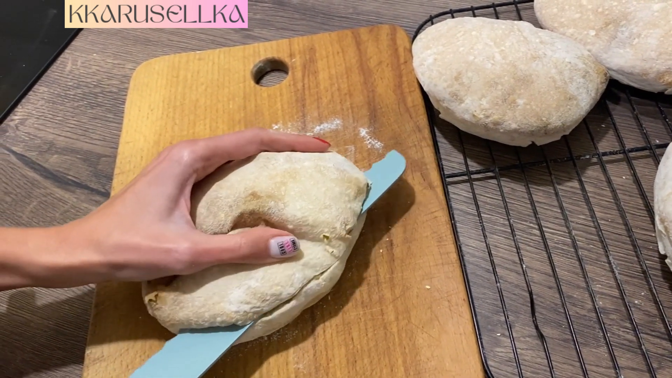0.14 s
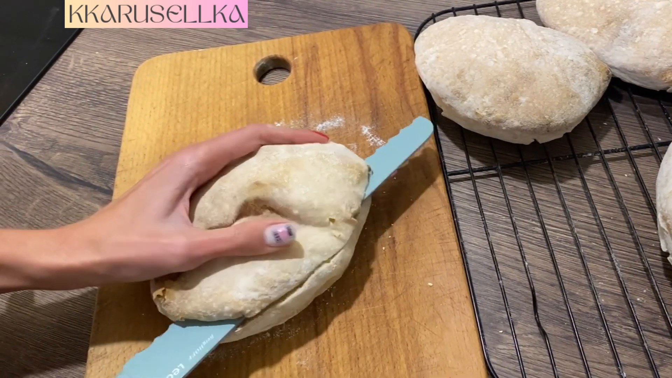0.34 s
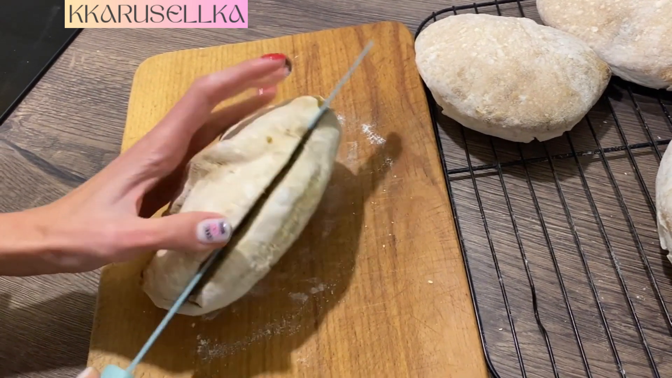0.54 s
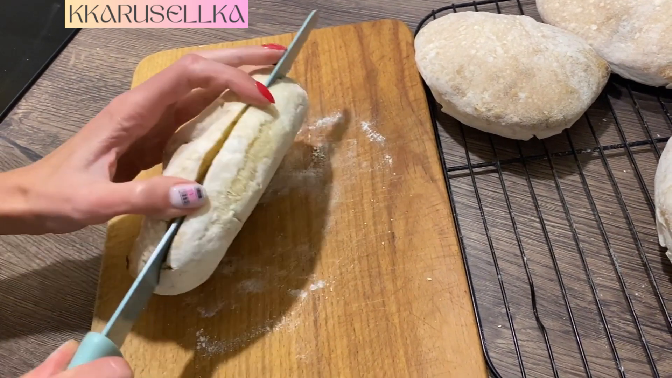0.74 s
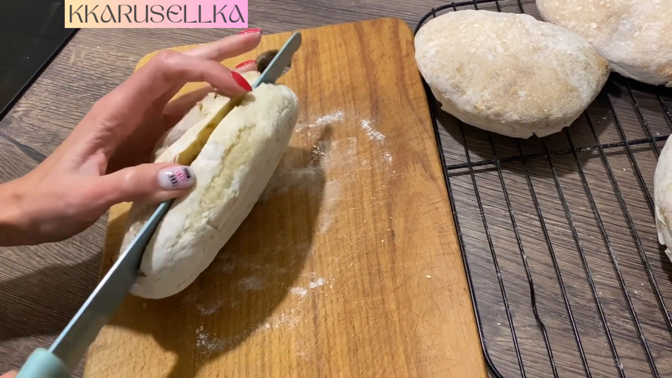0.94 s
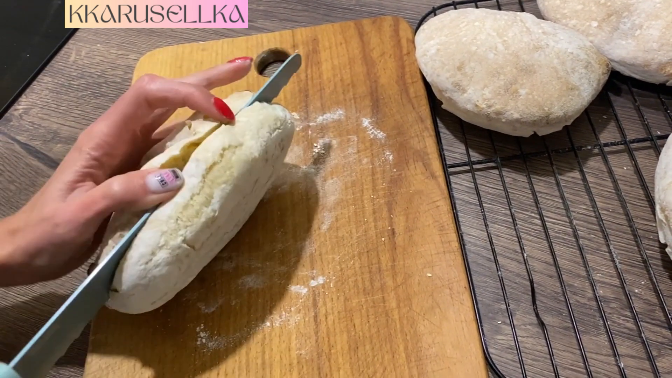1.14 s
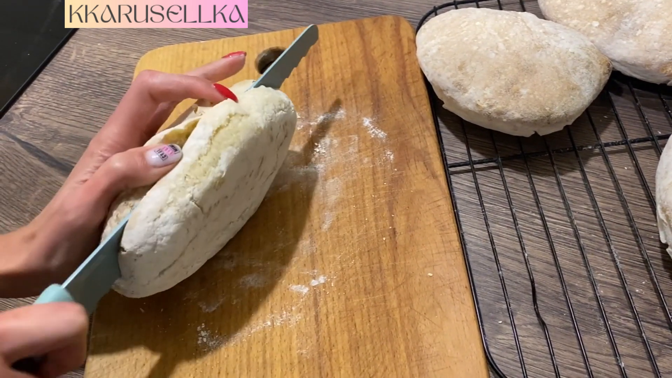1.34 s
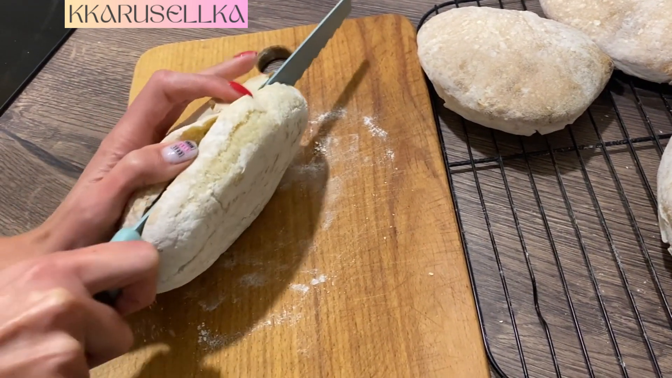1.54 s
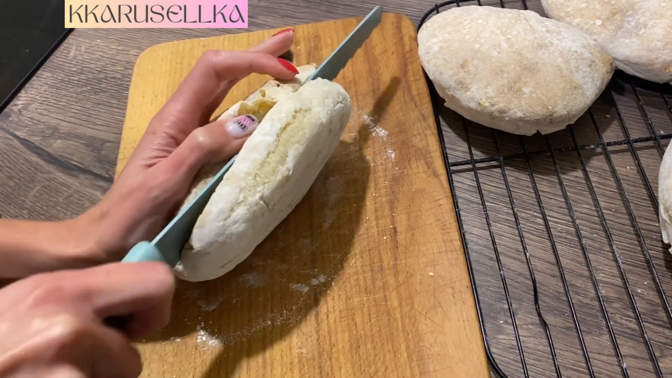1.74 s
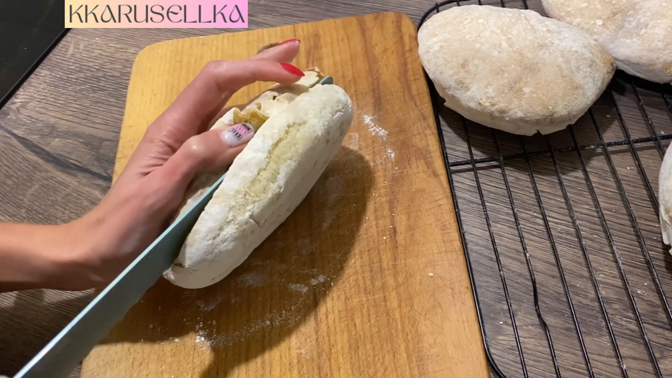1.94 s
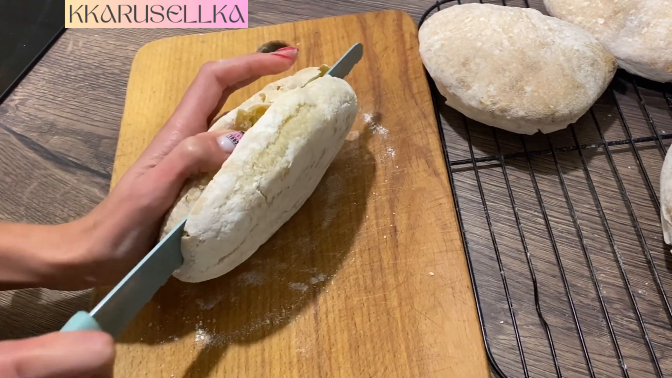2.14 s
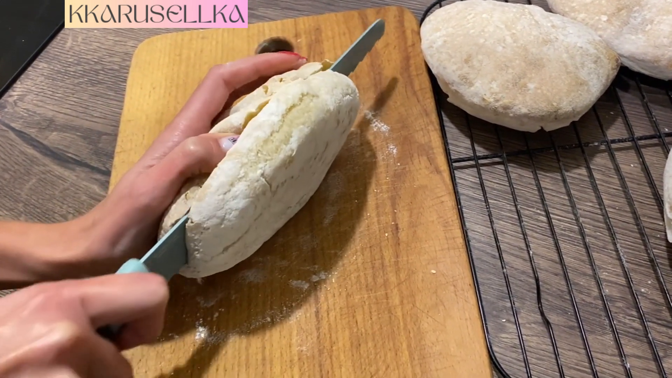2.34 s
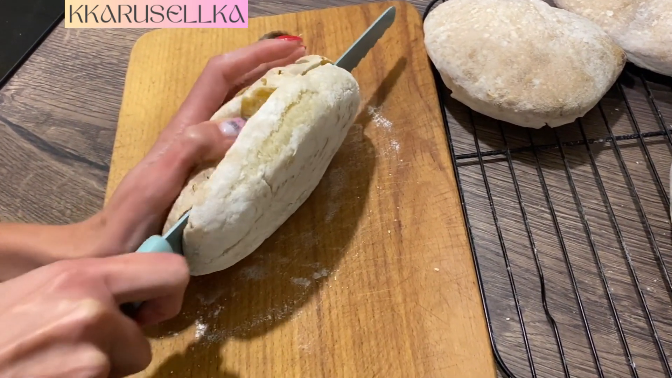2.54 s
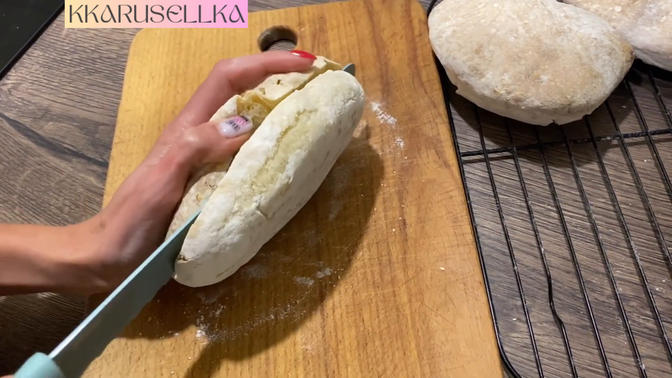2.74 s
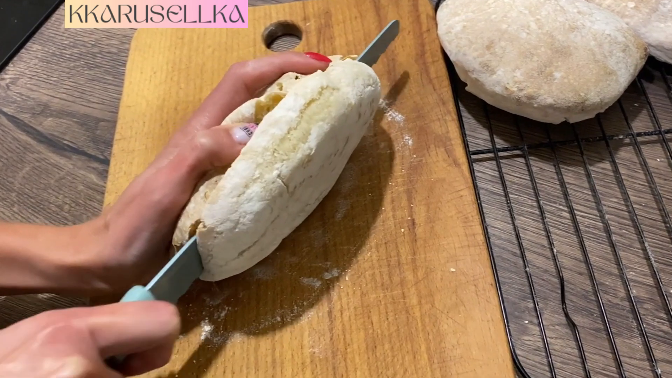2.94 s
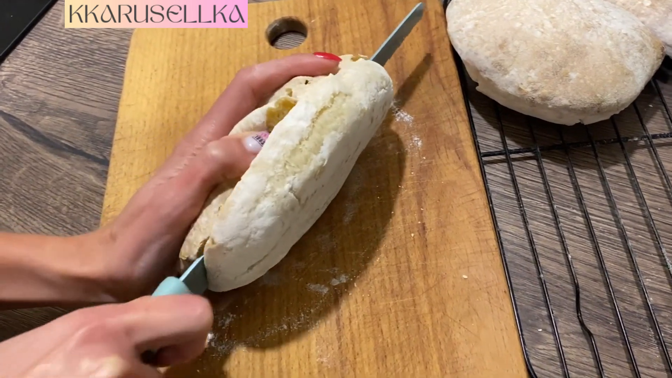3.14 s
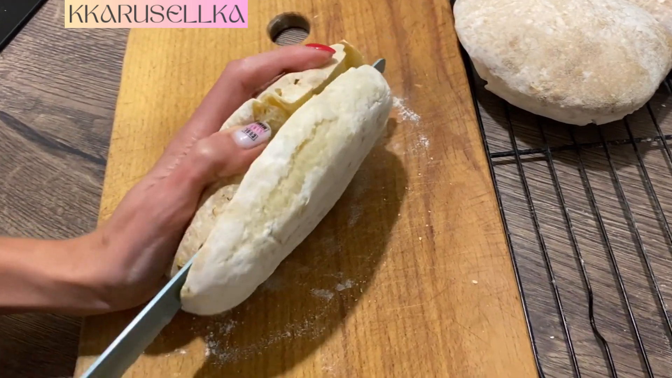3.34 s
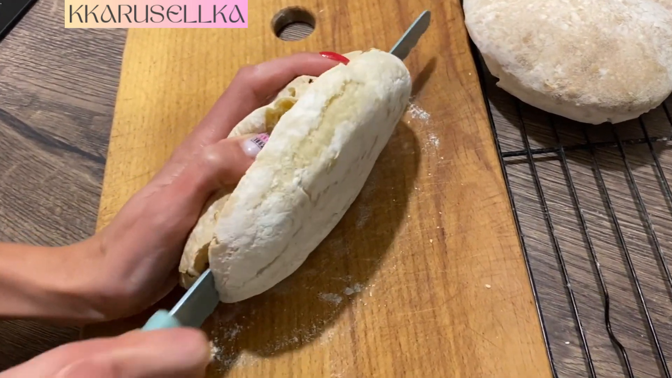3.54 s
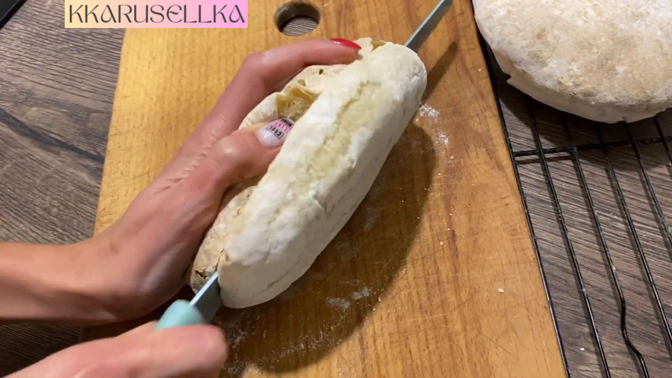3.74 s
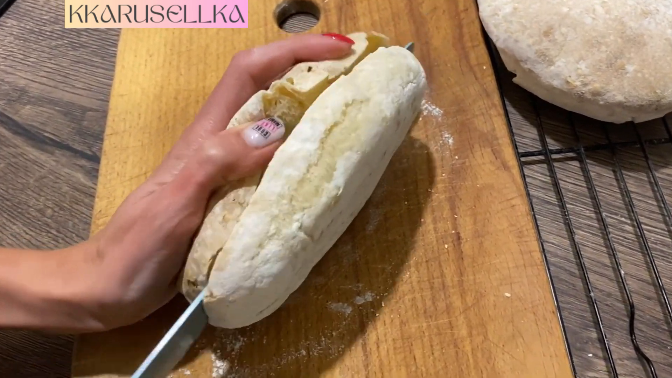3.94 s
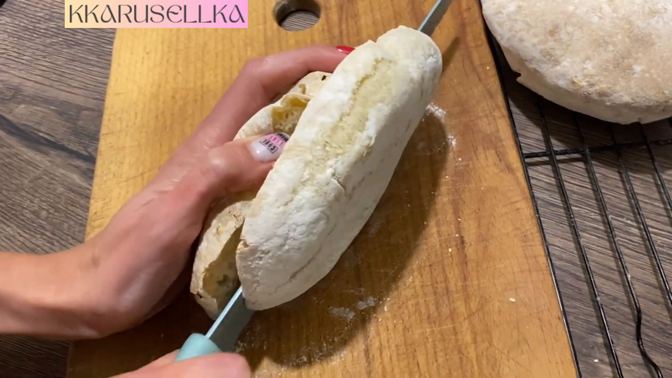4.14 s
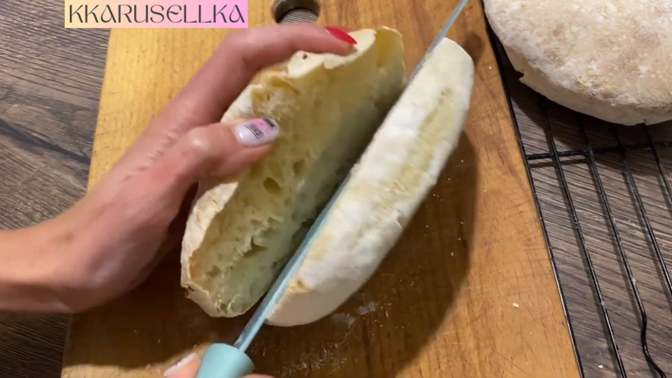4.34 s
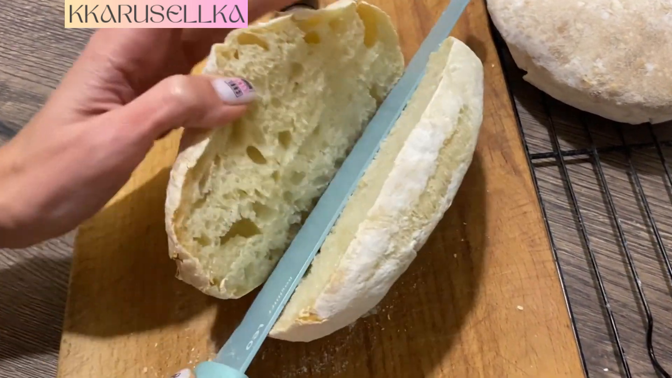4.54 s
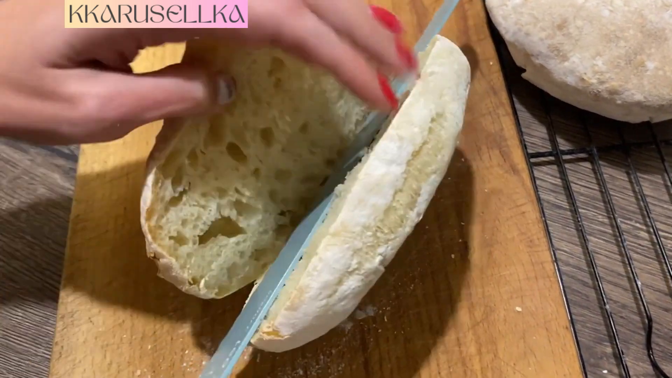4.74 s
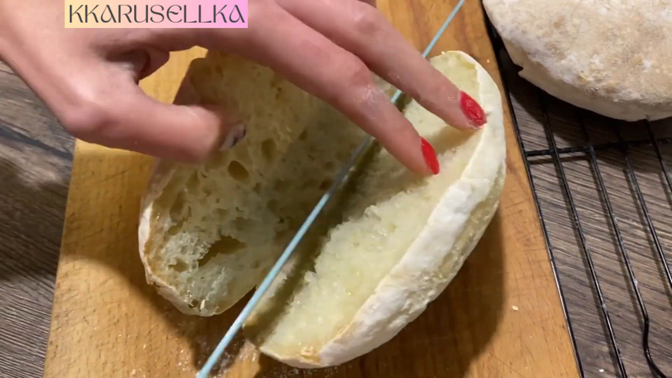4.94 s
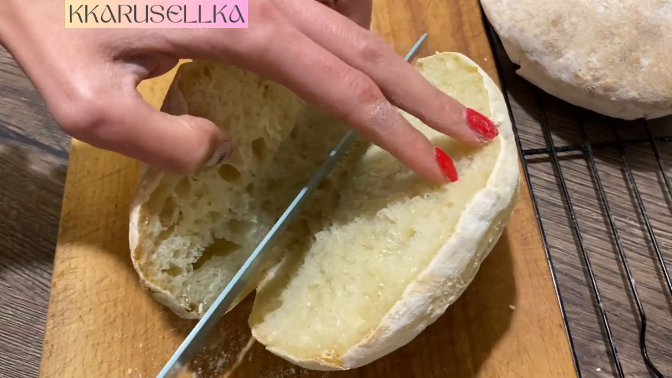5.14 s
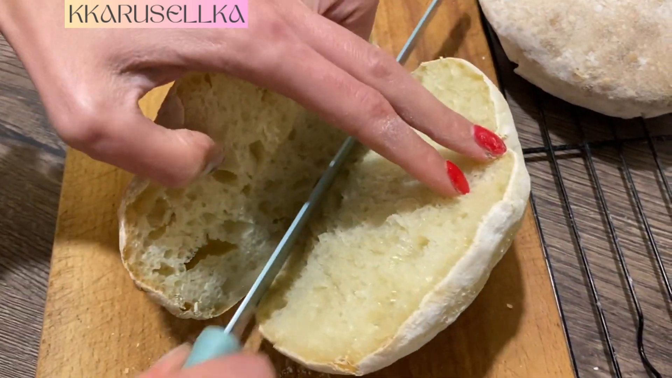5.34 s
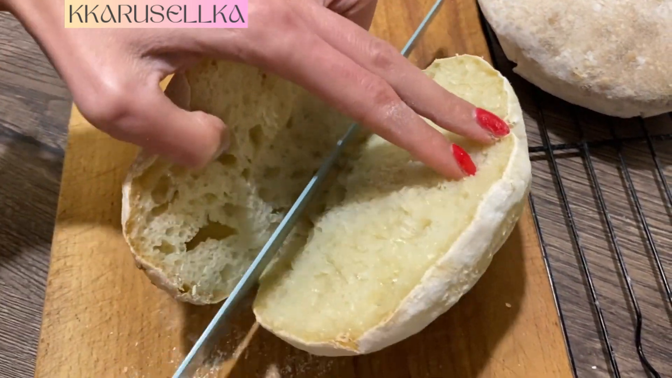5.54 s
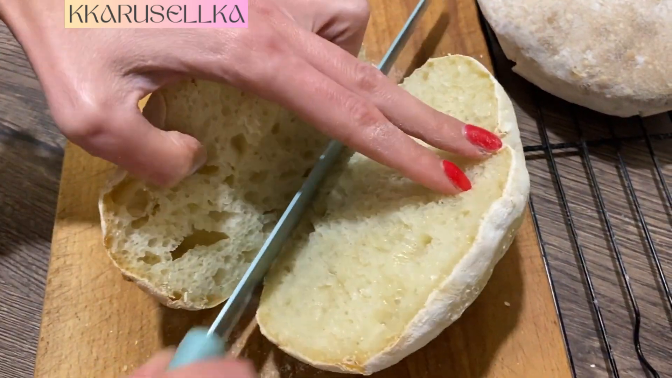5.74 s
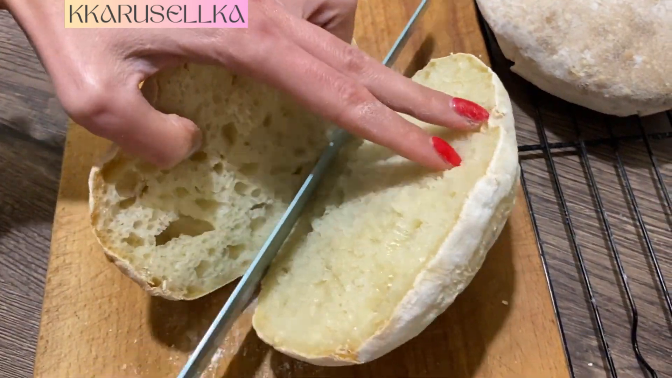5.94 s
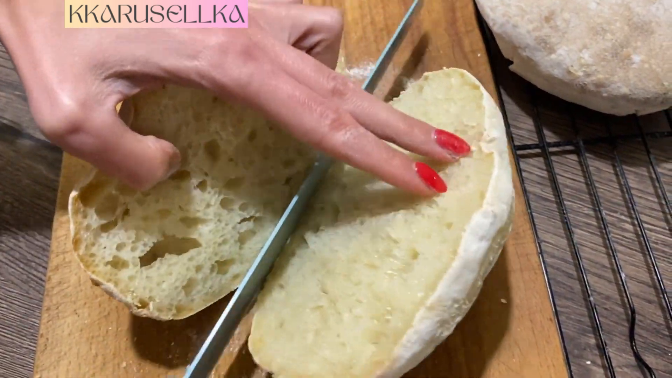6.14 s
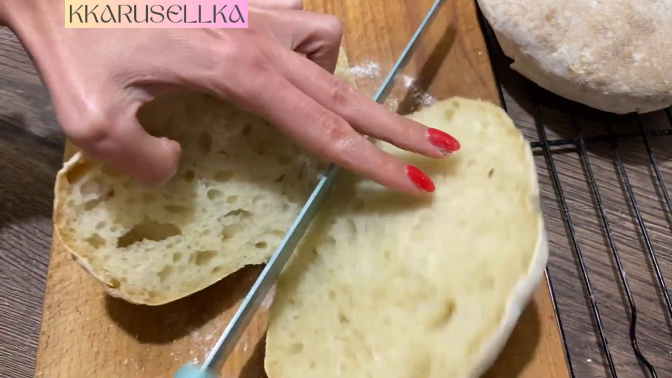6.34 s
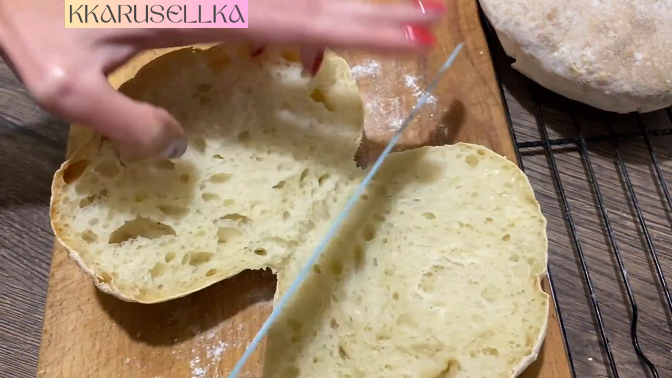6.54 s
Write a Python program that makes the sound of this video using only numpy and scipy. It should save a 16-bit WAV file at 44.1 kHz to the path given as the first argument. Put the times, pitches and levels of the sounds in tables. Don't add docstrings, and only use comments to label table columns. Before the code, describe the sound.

A close, dry stereo pickup beside a loaf on a wooden board in a small kitchen, with a low, steady fridge hum behind. From 0 s a long knife draws through crust with a hissing, gritty rasp, soft hand rustles and dull crumb crunches; a sharp crack comes near 0.7 s. Strokes alternate unevenly, with a bright, forceful one and a hard snap around 1.5 s. From 2 to 4 s they become shorter and closer together, thudding thickly in the crumb, with flakes ticking and the table booming faintly. At about 4.2 s the sawing dies to near silence, leaving slight finger rustles and hum. Light scratches return at 4.8 s, then quicker, firm strokes from 5.2 s to the end at 6.5 s, crackling through the bottom crust, with low bumps strongest around 5.5 to 6.2 s.

```python
import sys
import numpy as np
from scipy import signal
from scipy.fft import rfft, irfft, next_fast_len
from scipy.io import wavfile
from scipy.ndimage import uniform_filter1d, minimum_filter1d

SR = 44100
rng = np.random.default_rng(int(sys.argv[2]) if len(sys.argv) > 2 else 0)


def unload_audio(sound):
    columns = np.transpose(np.atleast_2d(sound))
    steps = np.round(np.clip(columns, -1, 1) * 32767)
    wavfile.write(sys.argv[1], SR, steps.astype(np.int16))


def natural_amplitude(level_db):
    exponent = np.asarray(level_db, float) / 20
    return 10 ** exponent


N = 289867


def knife():
    # (start [s], length [s], blade hiss [dB], swell along the stroke [dB],
    # crumb thud over hiss [dB])
    strokes = [(0.0, 0.35, -51.5, -13, 3), (0.403, 0.082, -54, 11.5, -3), (0.642, 0.25, -68, 13, 5.5),
               (0.959, 0.086, -49, -2, -1.5), (1.208, 0.29, -56.5, 9.5, 4.5), (1.541, 0.12, -42, 0.5, -6.5),
               (1.768, 0.16, -53.5, -8, 2.5), (2.032, 0.17, -54, 4, 3), (2.254, 0.077, -51.5, 1.5, 6),
               (2.35, 0.062, -54.5, 10, 6.5), (2.592, 0.1, -49, 1, 5.5), (2.778, 0.11, -53, 3.5, 4.5),
               (2.931, 0.18, -54.5, -7, 9.5), (3.201, 0.13, -55.5, 5, 9.5), (3.415, 0.075, -50, 13, 5),
               (3.53, 0.06, -50.5, 3, 10.5), (3.735, 0.13, -54.5, 3.5, 7.5), (3.966, 0.1, -46.5, 1.5, 4.5),
               (4.153, 0.011, -58.5, -6, 13.5), (4.244, 0.089, -67.5, 6, -11), (4.437, 0.02, -75, -21, -10)]
    last_strokes = [
        (4.787, 0.041, -65.5, 2.5, 7),
        (4.898, 0.17, -63.5, 3, 6.5),
        (5.184, 0.16, -48, 6, 1),
        (5.429, 0.063, -50.5, 4.5, 3),
        (5.523, 0.029, -51, 5, 7),
        (5.643, 0.14, -47, -1.5, 4.5),
        (5.861, 0.15, -49.5, 3, -0.5),
        (6.073, 0.12, -47, 4.5, 3),
        (6.285, 0.15, -49.5, 0, -2),
    ]
    # (time [s], crunch over hiss under the edge [dB], rustle of the resting hand [dB])
    grip = [(0, -4.5, -72), (.3, 3, -53), (.45, -3.5, -72.5), (.62, -2.5, -66.5), (1.0, -6, -80),
            (1.3, -3.5, -59.5), (1.6, -3.5, -55.5), (2.0, 0, -73.5), (2.5, -1.5, -69.5), (3.0, 2, -67),
            (3.4, 0, -56), (3.7, 2.5, -69.5), (4.05, 5.5, -71.5), (4.5, 2, -74), (4.72, 5, -84.5),
            (5.1, -0.5, -74), (5.8, 1.5, -90), (6.57, 2, -68.5)]
    # (frequency [Hz], density [dB per Hz])
    hiss_spectrum = [(2470, -18.5), (4200, -3), (4420, -1.5), (5430, -1), (6610, -8.5), (6760, -5.5),
                     (9140, -3.5), (13800, -9), (15800, -9.5), (16500, -33)]
    rasp_spectrum = [(1120, -33.5), (1900, 2.5), (2130, 3.5), (3010, -0.5), (3960, -6.5), (4700, -33),
                     (6110, -24), (10300, -120)]
    crunch_spectrum = [(410, -32), (700, -1.5), (1060, -0.5), (1270, -0.5), (1540, -3), (2100, -24),
                       (2730, -33), (4620, -120)]
    thud_spectrum = [(94, -46.5), (160, 0.5), (436, 1), (483, 6.5), (645, -6.5), (800, -3.5), (1040, -16),
                     (1760, -120)]
    # (frequency [Hz], width [Hz], level [dB])
    blade_modes = [(2120, 44, -25), (3190, 79, -10.5), (4820, 38, -20), (6900, 27, -14.5), (8300, 40, -25),
                   (9210, 90, -24), (13000, 40, -23)]
    board_modes = [(282, 82, -19), (358.7, 59, -14), (475.3, 51, -7), (563.7, 97, -5.5)]

    start, length, db, swell_db, depth_db = np.transpose(strokes + last_strokes)
    crust_db, rest_db = curves(grip)
    db = db - 1.5
    pace = np.where(start >= last_strokes[0][0], 1.72, 1)
    bite_db_per_s, stop_db_per_s, settle_db_per_s = pace * 367, pace * 266, pace * 245
    hiss_db = gestures(start, length, db, swell_db, bite_db_per_s, stop_db_per_s, rest_db)
    crumb_db = gestures(start, length, db + depth_db, swell_db, bite_db_per_s, settle_db_per_s, rest_db + 4)
    thud_db = crumb_db - hiss_db
    rasp_db = -1 + 0.047 * thud_db
    crunch_db = crust_db + 0.043 * thud_db

    fine = tears(per_s=3500, spread_db=3.5, rub=0.7, clump_db=2.0)
    coarse = tears(per_s=480, spread_db=1.7, rub=0.4, clump_db=1.0)
    hiss = evened(colour(fine + 0.16 * coarse, hiss_spectrum) + ring(fine, blade_modes[2:]))
    rasp = evened(colour(fine + 0.85 * coarse, rasp_spectrum) + ring(fine, blade_modes[:2]))
    crunch = colour(fine + 0.84 * coarse, crunch_spectrum)
    thud = evened(colour(fine + 1.0 * coarse, thud_spectrum) + ring(coarse, board_modes))

    catch_db = -2.0 + 0.63 * catches()
    bright = hiss + natural_amplitude(rasp_db) * rasp
    dull = natural_amplitude(crunch_db) * crunch + natural_amplitude(thud_db) * thud
    return natural_amplitude(hiss_db) * (natural_amplitude(0.45 * catch_db) * bright + natural_amplitude(catch_db) * dull)


def tears(per_s, spread_db, rub, clump_db):
    size = natural_amplitude(spread_db * np.minimum(rng.exponential(1, N), 4)) * rng.choice([-1., 1.], N)
    clicks = evened(size * (rng.random(N) < per_s / SR))
    lumps = wander(87) + 0.71 * wander(280)
    clumps = natural_amplitude(clump_db * 2 * np.tanh(lumps / 2))
    return evened(clumps * (clicks + rub * rng.standard_normal(N)))


def catches():
    # (time [s], extra tearing [dB], length [s])
    catch_rows = [(0.011, 1, 0.009), (0.046, 7, 0.011), (0.102, 6, 0.021), (0.176, 17, 0.022),
                  (0.225, 13, 0.0099), (0.244, 16.5, 0.031), (0.313, 6, 0.028), (0.457, 7.7, 0.016),
                  (0.528, 10, 0.024), (0.634, 16, 0.011), (0.673, 24, 0.028), (0.825, 16, 0.017),
                  (0.855, 11, 0.017), (0.907, 13, 0.006), (0.919, 16, 0.011), (0.97, -2, 0.02),
                  (1.064, 11, 0.048), (1.174, 13, 0.013), (1.25, 13, 0.023), (1.329, 16, 0.0084),
                  (1.415, 9, 0.007), (1.433, 12.5, 0.014), (1.462, 8, 0.014), (1.65, 3, 0.021),
                  (1.774, -1, 0.009), (1.787, 3, 0.009), (1.823, 17, 0.0098), (1.842, 12, 0.019),
                  (1.874, 17, 0.022), (1.941, 18, 0.02), (2.06, 10, 0.018), (2.12, 12, 0.023),
                  (2.15, 12, 0.015), (2.195, 8, 0.017), (2.253, -1, 0.02), (2.283, 4, 0.01),
                  (2.337, 10, 0.015), (2.392, 8, 0.012), (2.624, 8.7, 0.02), (2.686, 5.8, 0.01),
                  (2.72, 17, 0.009), (2.824, 8, 0.017), (2.874, 6.0, 0.019), (2.898, 4.7, 0.012),
                  (2.93, 1, 0.017), (3.066, 9, 0.013), (3.084, 0, 0.02), (3.155, 13, 0.01),
                  (3.233, 6.8, 0.017), (3.27, 14, 0.018), (3.303, 15, 0.012), (3.332, 9.4, 0.016),
                  (3.362, 16, 0.016),
                  (3.453, 6.8, 0.025), (3.497, 8.0, 0.02), (3.56, 6.8, 0.007), (3.599, 7.2, 0.022),
                    (3.638, 7.2, 0.022), (3.718, 4, 0.007), (3.786, 4.9, 0.016), (3.821, 6.2, 0.015),
                    (3.848, 4.6, 0.018), (3.873, 4.4, 0.013), (3.964, 5.3, 0.015), (4.05, 9.8, 0.014),
                    (4.082, 7.3, 0.019), (4.142, 12, 0.015), (4.175, 18, 0.02), (4.234, 27, 0.021),
                    (4.33, 4.6, 0.016), (4.401, 10, 0.0099), (4.43, 9.4, 0.02), (4.561, 16, 0.029),
                    (4.579, 11, 0.016), (4.611, 8.6, 0.012), (4.667, 4.6, 0.02), (4.755, 22, 0.019),
                    (4.787, 14, 0.014), (4.838, 5.2, 0.012), (4.874, 20, 0.03), (4.926, 6.9, 0.009),
                    (4.965, 10.8, 0.012), (5.003, 5.4, 0.009), (5.053, 7.1, 0.013), (5.083, 23, 0.019),
                    (5.176, 8.9, 0.0077), (5.204, 6, 0.016), (5.267, 11, 0.023), (5.298, 9.5, 0.0087),
                    (5.326, 8.8, 0.016), (5.36, 4.2, 0.01), (5.439, 15, 0.016), (5.487, 12, 0.02),
                    (5.535, 9.1, 0.0076), (5.559, 6.8, 0.015), (5.654, 3.1, 0.01), (5.701, 12, 0.0089),
                    (5.791, 5.7, 0.008), (5.905, 10, 0.019), (5.939, 12, 0.016), (6.011, 12, 0.02),
                    (6.099, 6.6, 0.008), (6.114, 7.0, 0.026), (6.187, 3.2, 0.0056), (6.217, 5.8, 0.016),
                    (6.292, 9.2, 0.026), (6.331, 10, 0.014), (6.386, 8.9, 0.031), (6.452, 7.9, 0.02)]
    s, db, length = np.transpose(catch_rows)
    t = np.arange(0, N + 32, 32)[:, None] / SR
    swell = (db * np.exp(-((t - s) / (0.4 * np.maximum(length, .003))) ** 2)).max(1)
    return np.interp(np.arange(N) / SR, t[:, 0], swell)


def gestures(start, length, db, swell_db, rise, fall, rest_db):
    t = np.arange(0, N + 64, 64)[:, None] / SR
    done = np.clip((t - start) / length, 0, 1) - .5
    before, after = np.maximum(start - t, 0), np.maximum(t - start - length, 0)
    level = db + swell_db * done - rise * before - fall * after
    power = np.interp(np.arange(N) / SR, t[:, 0], (natural_amplitude(level) ** 2).sum(1))
    return 10 * np.log10(power + natural_amplitude(rest_db) ** 2)


def curves(rows):
    s, *columns = np.transpose(rows)
    return [np.interp(np.arange(N) / SR, s, c) for c in columns]


def evened(x):
    return x / np.sqrt(np.mean(x ** 2) + 1e-20)


def wander(per_s):
    span = int(SR / per_s)
    return evened(uniform_filter1d(uniform_filter1d(rng.standard_normal(N), span), span))


def read(points, hz):
    f, value = np.transpose(points)
    return np.interp(np.log(hz + 1), np.log(f + 1), value)


def colour(x, points):
    db = read(points, abs(np.fft.fftfreq(4096, 1 / SR)))
    log_gain = np.log(natural_amplitude(np.maximum(db, -80)))
    taps = np.fft.ifft(np.exp(np.conj(signal.hilbert(log_gain)))).real[:2048]
    return evened(signal.oaconvolve(x, taps)[:N])


def ring(x, modes):
    out = np.zeros(N)
    for hz, width, db in modes:
        b, a = signal.iirpeak(hz, hz / width / 1.42, SR)
        out += natural_amplitude(db) * evened(signal.lfilter(b, a, signal.lfilter(b, a, x)))
    return out


def crust_snaps():
    # (time [s], peak [dB], ring [Hz], t60 [s])
    cracks = [(0.6657, -22.5, 5060, 0.017), (1.2059, -37.5, 2540, 0.019), (1.2511, -36.5, 2480, 0.11),
              (1.5031, -12, 6250, 0.0029), (2.1106, -29, 2700, 0.064), (2.1848, -25.5, 2700, 0.015),
              (2.2493, -29.5, 2200, 0.0051), (2.3352, -23, 2610, 0.0072), (2.3616, -30, 9200, 0.0033),
              (2.534, -38, 12200, 0.0065), (2.8135, -30.5, 2130, 0.025), (2.926, -24, 4570, 0.0079),
              (3.2623, -34, 4940, 0.0042), (3.4411, -29, 4340, 0.041), (3.5554, -35, 2500, 0.031),
              (4.7524, -39.5, 4020, 0.017), (4.785, -44.5, 10900, 0.016), (4.903, -40, 6770, 0.028),
              (4.962, -33, 2180, 0.028), (5.0, -36.5, 2150, 0.053), (5.0389, -38, 2120, 0.018),
              (5.0775, -43, 2800, 0.024), (5.167, -39.5, 2040, 0.0086), (5.2644, -28, 2100, 0.024),
              (5.3285, -37, 2140, 0.01), (5.4363, -35, 2530, 0.0043), (5.5291, -25, 2140, 0.012),
              (5.9329, -22.5, 4760, 0.0074), (6.111, -23.5, 2380, 0.012), (6.1873, -22, 3560, 0.0058)]
    return burst(cracks, rise_s=0.00052, width=0.62, brittle_hz=5350, gain_db=-1.5, tick=0.29)


def crumb_knocks():
    # (time [s], peak [dB], ring [Hz])
    knocks = [(0.047, -51, 364), (0.091, -43, 556), (0.153, -38, 875), (0.223, -29, 1040),
              (0.295, -32, 940), (0.6655, -41.5, 1020), (1.251, -39.5, 515), (1.849, -32, 615),
              (2.334, -39, 580), (2.597, -40, 535), (2.717, -40, 666), (2.816, -38, 1220),
              (2.925, -34, 614), (3.061, -36.5, 580), (3.269, -33.5, 520), (3.295, -31, 570),
              (3.327, -30, 464), (3.452, -34, 480), (3.558, -28.5, 490), (3.845, -36, 570),
              (4.14, -33, 1070), (4.231, -31.5, 1120), (4.754, -46.5, 428), (5.173, -35.5, 1480),
              (5.197, -34.5, 1020), (5.266, -31, 1660), (5.323, -34, 580), (5.533, -31, 950),
              (5.644, -46, 945), (5.052, -38, 567), (5.297, -32.5, 640), (5.558, -36, 603),
              (3.494, -31.5, 845), (3.506, -29.5, 700), (5.95, -38, 605), (5.699, -36, 1130)]
    rows = [(*row, .014) for row in knocks]
    return burst(rows, rise_s=0.0008, width=0.72, brittle_hz=302, gain_db=2.0, tick=6.6)


def flake_ticks():
    # (time [s], peak [dB], ring [Hz])
    flicks = [(0.0104, -28, 4800), (0.17, -36, 5310), (0.4655, -42, 3650), (0.9178, -41, 3050),
              (1.4293, -33.5, 3200), (1.8198, -40, 3180), (1.897, -43, 4170), (2.2165, -37, 3540),
              (2.2409, -27.5, 10800), (2.2634, -36, 6510), (2.6877, -35.5, 3170), (2.7746, -38, 4870),
              (2.87, -31.5, 4860), (3.061, -34, 4770), (3.098, -40, 3430), (3.3609, -33.5, 3250),
              (3.4947, -33, 4860), (3.5563, -31.5, 3630), (5.0507, -37, 4580), (5.3073, -26, 3880),
              (5.3696, -34, 4060), (5.4814, -29.5, 4660), (5.4956, -37, 3890), (5.5752, -40, 4150),
              (5.6595, -31.5, 3580), (5.789, -40, 3710), (5.8184, -47, 4080), (6.209, -32.5, 3870)]
    rows = [(*row, .005) for row in flicks]
    return burst(rows, rise_s=0.0003, width=0.9, brittle_hz=8800, gain_db=4.0, tick=0.9)


def soft_rustles():
    # (time [s], peak [dB], centre [Hz], t60 [s])
    rustles = [(4.42, -44.5, 2040, 0.054), (2.3, -50, 2376, 0.19), (4.59, -53, 1700, 0.07),
               (0.236, -23.5, 1380, 0.013), (0.01, -28, 1360, 0.02), (0.043, -25.5, 1200, 0.03),
               (0.089, -30.5, 1500, 0.023), (0.2, -33, 1100, .02), (0.297, -31, 1100, 0.019),
               (0.317, -35.5, 1100, .03), (4.5, -38, 1200, 0.05), (4.399, -50, 1400, 0.018),
               (0.15, -32, 1150, 0.059), (0.308, -34, 1150, 0.033), (4.5, -51, 1600, 0.042),
               (4.232, -54, 1000, 0.026), (0.15, -41, 1200, 0.049), (0.224, -33, 1350, 0.052),
               (4.57, -52, 453, 0.12), (3.695, -42, 8000, 0.0068), (5.9, -57, 4000, 0.027),
               (5.036, -31, 1700, 0.03), (5.078, -38, 1500, 0.013)]
    return burst(rustles, rise_s=0.0054, width=0.63, brittle_hz=1300, gain_db=-2.5, tick=0.06)


def burst(events, rise_s, width, brittle_hz, gain_db, tick):
    out, t = np.zeros(N + 4000), np.arange(4000) / SR
    chance = rng.standard_normal((len(events), 4000))
    for (s, peak_db, hz, t60), noise in zip(events, chance):
        puff = noise * (1 - np.exp(-t / rise_s)) * natural_amplitude(-60 * t / np.clip(t60, .004, .15))
        puff[12] += tick
        b, a = signal.iirpeak(hz, 1 / width, SR)
        rung = signal.lfilter(b, a, signal.lfilter(b, a, puff))
        softened = signal.lfilter([1], [1, -.4], puff)
        dull = signal.lfilter([1, -1], np.convolve([1, -.62], [1, -.93]), softened)
        share = np.clip(hz / brittle_hz - .5, .1, .97)
        sound = share * rung / abs(rung).max() + (1 - share) * dull / abs(dull).max()
        at = round(s * SR)
        out[at:][:4000] += (natural_amplitude(peak_db + gain_db) * sound)[:len(out) - at]
    return out[:N]


def table():
    # (frequency [Hz], width [Hz], level [dB])
    table_modes = [(57, 31, -17), (71.5, 15, -1), (86.2, 9.4, 1.5), (144.7, 16.4, -8.5)]
    # (start [s], length [s], level [dB])
    pushes = [(0.093, 0.099, -41.5), (0.248, 0.18, -55.5), (0.494, 0.38, -62), (0.964, 0.23, -53),
              (1.192, 0.095, -50.5), (1.334, 0.082, -42.5), (1.497, 0.029, -38.5), (1.69, 0.4, -52.5),
              (2.134, 0.028, -40.5), (2.321, 0.15, -42.5), (2.6, 0.15, -48.5), (2.84, 0.016, -40),
              (2.9, 0.248, -47.5), (3.29, 0.1, -44), (3.436, 0.17, -44), (3.72, 0.27, -51.5),
              (3.914, 0.4, -50), (4.24, 0.04, -52), (4.574, 0.079, -51.5), (4.784, 0.02, -50.5),
              (4.97, 0.2, -50.5), (5.236, 0.024, -41), (5.313, 0.027, -37), (5.358, 0.021, -40.5),
              (5.496, 0.021, -31.5), (5.57, 0.016, -27.5), (5.69, 0.095, -34.5), (5.904, 0.082, -33),
              (6.151, 0.029, -33), (6.348, 0.11, -43.5)]
    boom = ring(rng.standard_normal(N), table_modes)
    swell = np.sqrt(uniform_filter1d(boom ** 2, size=2600) + 1e-9)
    push_db = gestures(*np.transpose(pushes), swell_db=0, rise=248, fall=208, rest_db=-68)
    return natural_amplitude(push_db - 3) * evened(boom / swell ** 0.7)


def ports(x):
    # (frequency [Hz], phase [rad])
    lead = [(0, 0), (780, -1.6), (1550, -1.0), (2070, -4.1), (3010, -3.7), (5430, -5.6), (6720, -3.5),
            (6980, -4.5), (7320, -3.1), (7750, -0.0), (15900, -0.0), (16400, -0.4)]
    # (frequency [Hz], level [dB])
    tilt = [(60, -12), (130, -2.5), (290, 2), (640, -2.5), (1410, -5.5), (3100, 1), (6820, 0.5),
            (15000, -0.5)]
    size = next_fast_len(N + 4096)
    hz = np.fft.rfftfreq(size, 1 / SR)
    half = natural_amplitude(read(tilt, hz) / 2) * np.exp(.5j * np.interp(hz, *np.transpose(lead)))
    pair = np.array([half, 1 / half])
    pair = pair / np.sqrt(abs(pair.mean(0)) ** 2 + 0.47)
    return irfft(rfft(x, size) * pair, size)[:, :N]


def drifting(x, patchy_db, turn):
    hz, t, z = signal.stft(x, SR, nperseg=512, noverlap=384)
    field = rng.standard_normal((3, len(hz), len(t)))
    smooth = [uniform_filter1d(uniform_filter1d(f, size=8, axis=0), size=7, axis=1) for f in field]
    level, left, right = (evened(f) for f in smooth)
    reach = (hz / (hz + 350))[:, None] ** 2
    z = z * natural_amplitude(patchy_db * reach * level) * np.exp(1j * turn * reach * np.array([left, right]))
    return signal.istft(z, SR, nperseg=512, noverlap=384)[1][:, :N]


def kitchen(x):
    # (frequency [Hz], t60 [s])
    room_decay = [(100, 0.071), (1000, 0.16), (5000, 0.16), (15000, 0.038)]
    # (frequency [Hz], level [dB])
    wet = [(100, -49), (300, -4.5), (600, 0), (1500, -4), (3000, 0), (6000, -6), (15000, -7)]
    taps = np.zeros((2, SR // 2))
    slots = np.arange(60, SR // 2 - 20, 20)
    at = slots + rng.integers(0, 20, (2, len(slots)))
    np.put_along_axis(taps, at, rng.choice([-1., 1.], at.shape), 1)
    hz, t, z = signal.stft(taps, SR, nperseg=256)
    decay = natural_amplitude(-60 * t / read(room_decay, hz)[:, None])
    decay = decay / np.linalg.norm(decay, axis=1, keepdims=True) * natural_amplitude(read(wet, hz))[:, None]
    tail = signal.istft(z * decay, SR, nperseg=256)[1]
    return signal.fftconvolve(x[None], 0.27 * tail, axes=1)[:, :N]


def background():
    # (frequency [Hz], width [Hz], level [dB])
    fridge_modes = [(124.4, 5.4, -63.5), (142.4, 5.4, -62), (285.7, 19, -72.5), (91, 38, -68.5)]
    # (frequency [Hz], density [dB per Hz])
    air_spectrum = [(100, -12.5), (170, -10), (210, 2), (230, -2), (307, -2.5), (619, -31), (708, -23),
                    (2210, -18.5), (7060, -73), (9220, -21), (16000, -41)]
    air = np.array([colour(rng.standard_normal(N), air_spectrum) for _ in range(2)])
    low = signal.lfilter(*signal.butter(2, 330, fs=SR), air[1] - air[0])
    treble = signal.lfilter(*signal.butter(2, 200, "high", fs=SR), air[0])
    air = np.array([air[0], air[1] - low]) / np.std(treble)
    motor = natural_amplitude(-57.0) * np.sqrt(2) * np.sin(2 * np.pi * 119.8 * np.arange(N) / SR)
    return natural_amplitude(-70.5) * air + ring(rng.standard_normal(N), fridge_modes) + motor


def scene():
    saw = knife()
    flakes = crust_snaps() + crumb_knocks() + flake_ticks() + soft_rustles()
    moving = drifting(ports(saw) + kitchen(saw + flakes), patchy_db=1.0, turn=.8)
    boom = table() * natural_amplitude([[-.45], [.45]])
    return moving + ports(flakes) + boom + background()


def starve(x):
    # (low edge [Hz], high edge [Hz], share of frames [0-1])
    starved = [(7000, 7750, .92), (6500, 7000, .25), (9900, 10300, .3), (10300, 11000, .27),
               (13200, 13600, .5), (13600, 14100, .6)]
    mid_side = np.array([x[0] + x[1], x[0] - x[1]]) / 2
    hz, t, z = signal.stft(mid_side, SR, nperseg=2048, noverlap=1536)
    power = uniform_filter1d(np.diff(x.mean(0), prepend=0) ** 2, size=40)
    peak = -minimum_filter1d(-power, size=1600)
    crest_db = 10 * np.log10(peak / uniform_filter1d(power, size=3000) + 1e-12) + 5
    crest_db = crest_db[np.minimum((t * SR).astype(int), N - 1)]
    calm = crest_db < 15

    def chosen(share):
        luck = uniform_filter1d(rng.standard_normal(len(t)), size=9)
        return calm & (luck <= np.quantile(luck, share))

    keep = np.ones(z.shape)
    keep[1][np.ix_(hz > 7650, chosen(.4))] = 0
    keep[:, hz > 16900] = 0
    keep[:, hz > 15850] *= crest_db > 21
    for low_hz, high_hz, share in starved:
        keep[0][np.ix_((hz > low_hz) & (hz < high_hz), chosen(share))] = 0
    mid, side = signal.istft(z * keep, SR, nperseg=2048, noverlap=1536)[1][:, :N]
    return np.array([mid + side, mid - side])


def band_limit(x):
    return signal.sosfilt(signal.butter(12, 16820, fs=SR, output="sos"), x)


def record(dry):
    finished = starve(dry)
    return band_limit(finished)


dry = scene()
out = record(dry)
unload_audio(out)
```